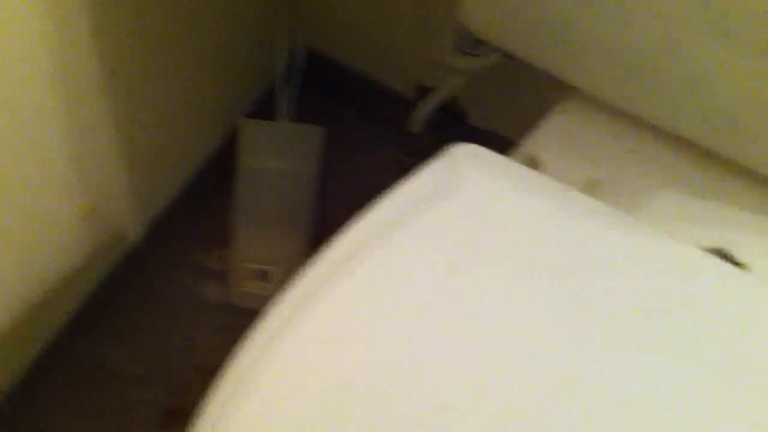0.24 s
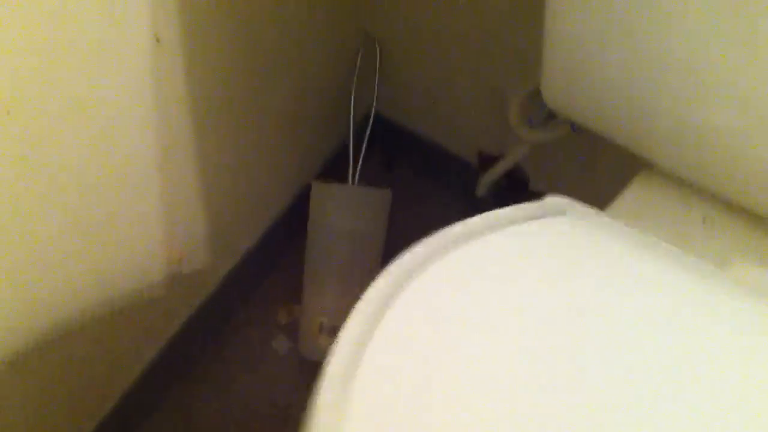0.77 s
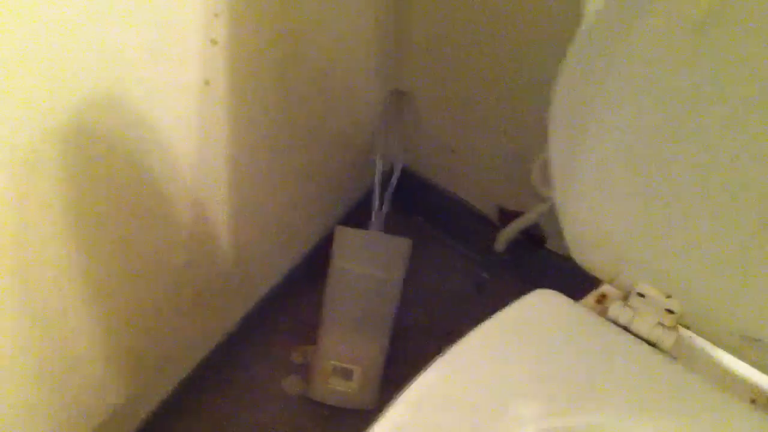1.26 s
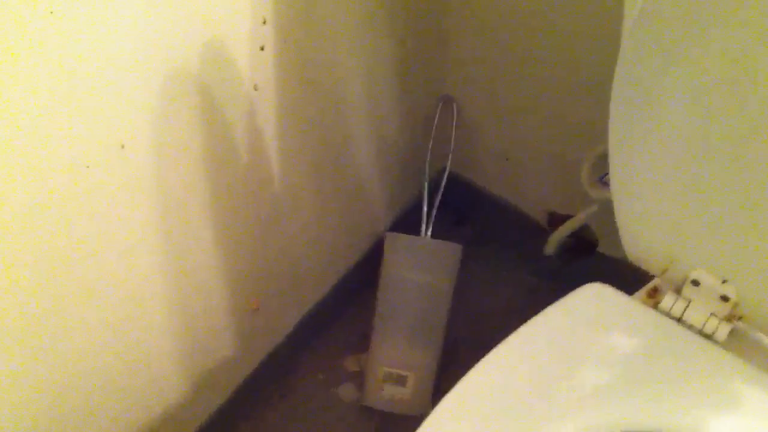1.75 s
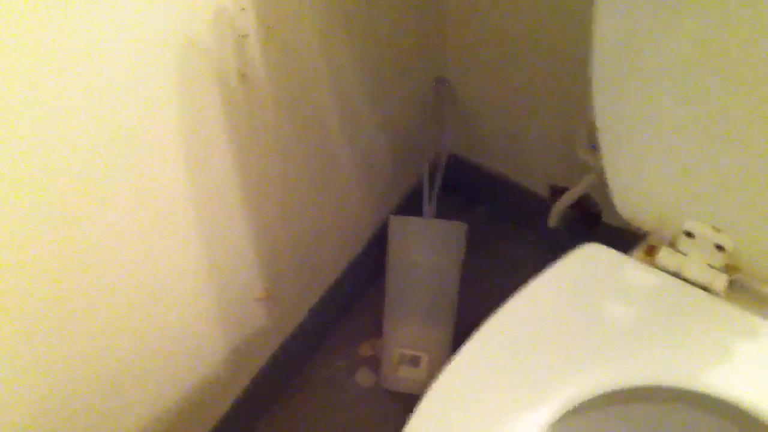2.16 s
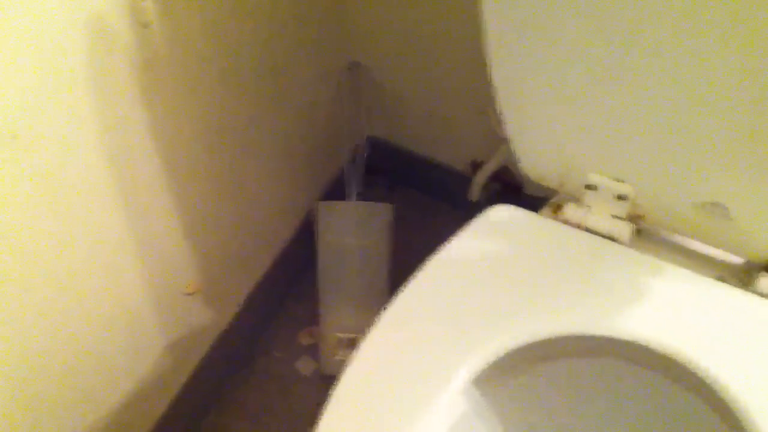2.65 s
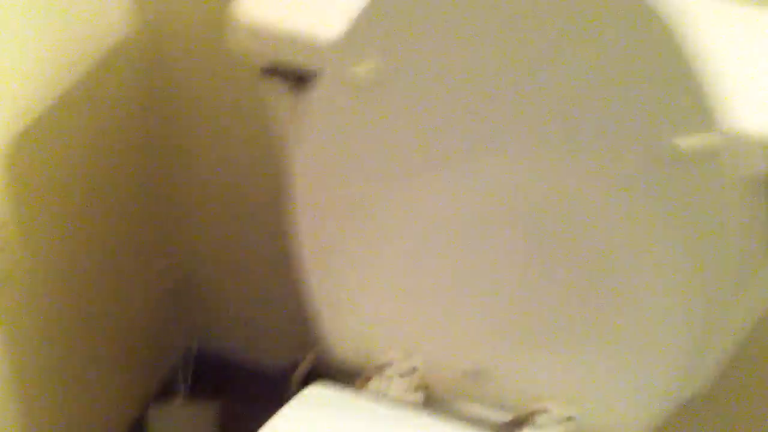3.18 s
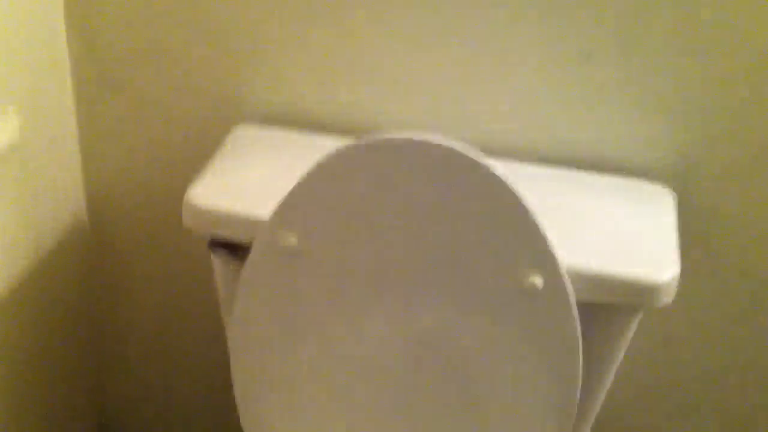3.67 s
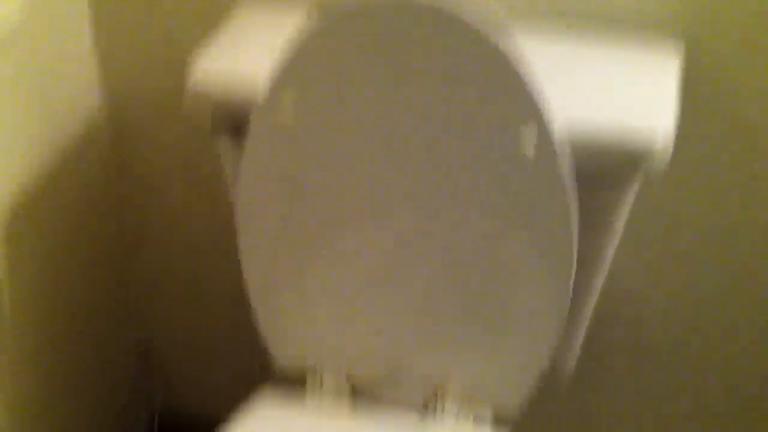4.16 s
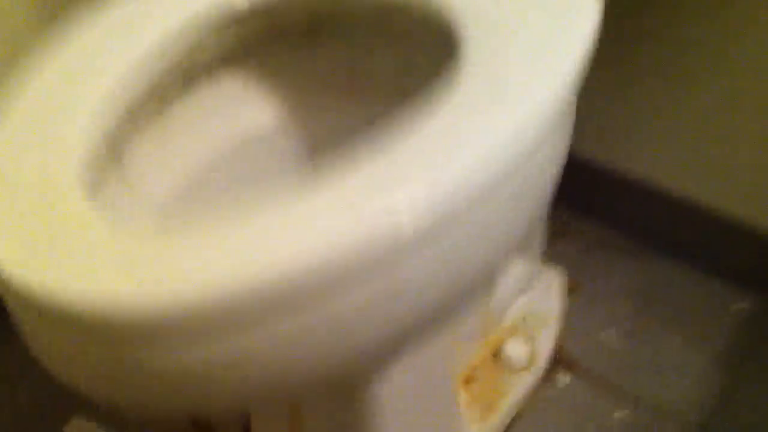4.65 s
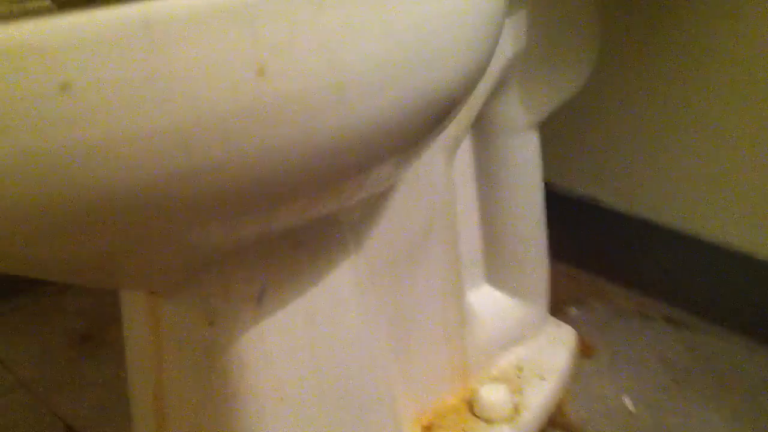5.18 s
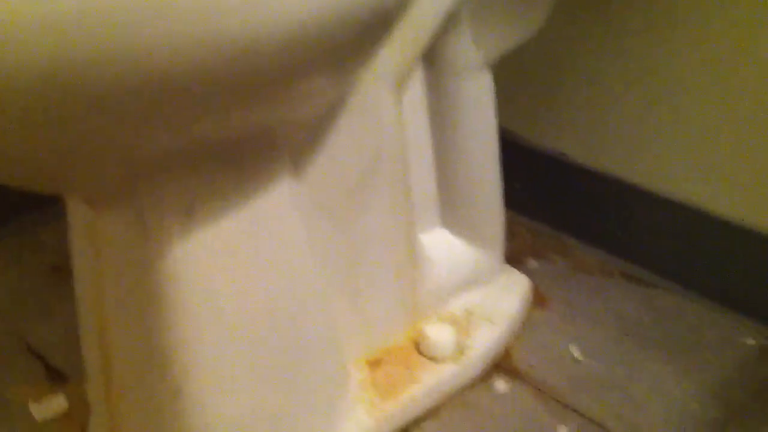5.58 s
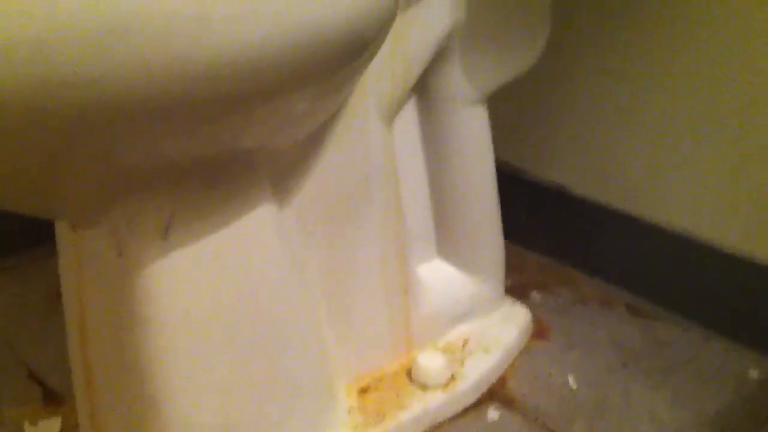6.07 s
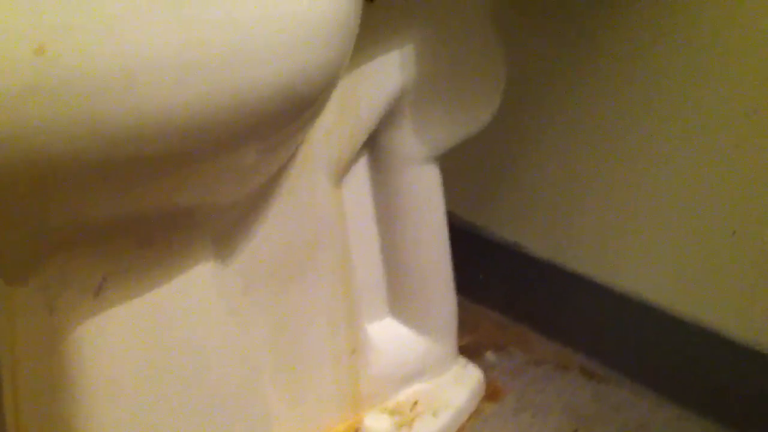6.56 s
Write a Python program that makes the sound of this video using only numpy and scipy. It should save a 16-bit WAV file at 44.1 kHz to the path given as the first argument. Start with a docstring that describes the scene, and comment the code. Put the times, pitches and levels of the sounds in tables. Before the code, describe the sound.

Water rushes softly into a toilet tank, a lid clacks once, and the hissing flow stops with a pipe knock while a fan hums.

```python
"""A toilet tank refills in a small restroom: water rushes steadily into the hollow tank.
After one faint click the raised plastic lid knocks back against the tank. The fill valve narrows,
hisses brighter and slams shut, so the pipe knocks and shudders. A few light ticks and bumps follow.
A fan hums throughout."""
import sys
import numpy as np
from scipy import signal
from scipy.fft import rfft, irfft
from scipy.io import wavfile

SR = 44100
rng = np.random.default_rng(int(sys.argv[2]) if len(sys.argv) > 2 else 0)


def put_to_file(sound):
    """Save the sound as 16-bit audio at rate SR, in the file named by the first command-line argument."""
    columns = np.atleast_2d(sound).T  # one column per channel
    safe = np.clip(columns, -1, 1)
    whole_steps = np.round(safe * 32767)
    wavfile.write(sys.argv[1], SR, whole_steps.astype(np.int16))


N = 300673
TIME = np.arange(N) / SR
HZ = np.maximum(np.fft.rfftfreq(N, 1 / SR), 1)
SHUT_S = 5.126  # fill valve seats

# pipe and tank wall modes (frequency [Hz], level [dB], t60 [s])
PIPE_MODES = [(114, -16.5, 0.055), (165, -11.5, 0.08), (327.6, -13, 0.073), (475, -11, .035),
              (580, -18, .06), (820, -14, 0.071), (990, -25, 0.038), (1540, -11, 0.033),
              (1620, -11.5, 0.032)]


def refill(rush_db=-48.5, walls_db=-3):
    """Water rushes into the hollow tank, heard from a point that moves from its side to its front."""
    # rush spectra (frequency [Hz], density [dB])
    beside_spectrum = [(50, -50.5), (80, -28), (115, -7.5), (175, 2), (265, -11), (310, -1.5), (540, -3.5),
                       (700, -8), (1000, -11.5), (1600, -10), (2700, -20.5), (4500, -23), (8000, -35),
                       (12000, -44.5)]
    front_spectrum = [(47, -68), (80, -34.5), (103, -24), (141, -8.5), (163, -2.5), (201, -19.5),
                      (233, 0.5), (264, -4.5), (362, -3.5), (465, -12.5), (754, -0.5), (1330, -10),
                      (1510, -10), (2710, -19), (12000, -41.5), (15600, -70.5), (22000, -120)]
    # cavity resonances (frequency [Hz], width [Hz], lift [dB])
    tank_resonances = [(226.6, 10, 13.5), (303, 60, 6.5), (412, 4.8, 9), (488, 20, 7), (615.4, 12, 11.5),
                       (639.6, 18, 11), (750.5, 18, 12), (860, 41, 7.5), (1245, 17, 12.5), (1500, 120, 1)]
    # wall reflection (frequency [Hz], level [dB])
    wall_spectrum = [(300, -13), (900, -3), (2000, -5.5), (17000, -3.5)]
    # listening position (time [s], front share [0-1])
    position = [(2.7, 0.12), (3.4, 0.72), (4.4, 0.63), (4.9, 0.61)]
    front = at_time(position)
    beside_water, front_water = noise(beside_spectrum, tank_resonances), noise(front_spectrum)
    rush = 0
    for share, water in ((1 - front, beside_water), (front, front_water)):
        echoes = reflections(water, wall_spectrum, build_s=0.00099)  # own pattern per position
        rush = rush + np.sqrt(share) * rms_one(water + from_db(walls_db) * echoes)
    return valve_open() * (from_db(rush_db) * rush + valve_spray())


def valve_spray():
    """The narrowing valve sprays ever louder, with one earlier surge and flurries of thin sizzle."""
    # spray at the seat (frequency [Hz], density [dB])
    spray_spectrum = [(1200, -13), (2800, -0.5), (4500, 1), (7000, -1.5), (9000, -3.5), (11500, -8),
                      (14500, -5.5), (17000, -5.5)]
    # sizzle flurries (time [s], length [s], level [dB])
    flurries = [(3.097, .3, -74), (4.335, .03, -75), (4.478, .04, -68)]
    sizzle = sum(swell(s, db, 190, 190, hold_s=length_s) for s, length_s, db in flurries)
    sizzle = sizzle * narrow_noise(hz=11100, width_hz=1900)
    spray = swell(SHUT_S, db=-50, rise_db_per_s=23, fall_db_per_s=0) * noise(spray_spectrum)
    surge = swell(s=3.48, db=-61, rise_db_per_s=21, fall_db_per_s=80)
    surge = surge * cut(noise(spray_spectrum), "low", hz=11000, order=1)
    return spray + surge + sizzle


def valve_open(choke_db_per_s=1299):
    """Flow gain: 1 until the valve seats, then choked off."""
    return from_db(-choke_db_per_s * np.maximum(TIME - SHUT_S, 0))


def valve_slam(peak_s=5.075, rise_db_per_s=1101):
    """The last water tears through the closing seat: rumble and bright spit, each with a faint tail."""
    # turbulence spectra (frequency [Hz], density [dB])
    judder_spectrum = [(20, -27), (50, -28), (85, -10.5), (125, 3.5), (210, -4.5), (340, 2), (420, -9),
                       (640, -4), (820, -12), (1150, -11.5), (1650, -15), (2200, -28), (3000, -58)]
    spit_spectrum = [(1060, -35), (1800, -4), (3510, -8.5), (4440, -12.5), (4740, -16.5), (5110, -16.5),
                     (7940, -25), (17000, -43)]
    judder = swell(peak_s, -9.5, rise_db_per_s, fall_db_per_s=349.5) * valve_open()
    judder += swell(SHUT_S, -45, rise_db_per_s, fall_db_per_s=120)
    spit = swell(peak_s, -22.5, rise_db_per_s=850, fall_db_per_s=420.5) * valve_open()
    spit += swell(SHUT_S, -62, rise_db_per_s, fall_db_per_s=190)
    return judder * noise(judder_spectrum) + spit * noise(spit_spectrum)


def water_hammer(gain_db=-1):
    """Pressure waves from the stopped water column strike the pipe."""
    # blows (time [s], strength [dB], contact [ms])
    blows = [(5.0372, -26.5, 0.3), (5.0648, -4, 0.42), (5.0728, -3.5, 0.085), (5.08, 6, 0.66),
             (5.0887, -10.5, 0.34), (5.1007, -11, 1), (5.1168, -8, 0.94), (5.1268, -18, 0.97)]
    return from_db(gain_db) * cut(ring(contacts(blows), PIPE_MODES), "high", hz=80.5, order=4)


def lid(room_db=-2, crack_db=-20):
    """The lid cracks against the china, rebounds and rings into the room."""
    # lid on tank (time [s], strength [dB], contact [ms])
    knocks = [(2.5884, -5, 0.048), (2.5907, 11, 0.39), (2.5985, 0, 0.32), (2.615, -13.5, 0.32),
              (2.6213, -11, 0.59), (2.661, -17.5, 0.67), (2.6802, -16, 0.32)]
    # lid and tank modes (frequency [Hz], level [dB], t60 [s])
    modes = [(88, -43, 0.45), (148.9, -35.5, 0.21), (190.4, -21.5, 0.21), (309.5, -27, 0.42),
             (375.2, -30, 0.262), (410.6, -39.5, 0.29), (459.5, -30.5, 0.38), (502, -27.5, 0.31),
             (532, -32.5, 0.25), (597, -24.5, 0.384), (629, -37, 0.3), (666.4, -26, 0.206),
             (710, -32.5, 0.24), (800, -34.5, 0.339), (869, -16.5, 0.075), (888, -28, 0.18),
             (908, -31, 0.35), (948, -23.5, 0.28), (1046, -16.5, 0.08), (1340, -29.5, 0.313),
             (1361, -31.5, 0.36), (1537, -23, 0.14), (1625, -19.8, 0.11), (1654, -34.5, 0.271),
             (1836, -24.5, 0.246), (2124, -27.5, 0.18), (2250, -28.5, 0.16), (2495, -31.5, 0.182),
             (2779, -26, 0.24), (3168, -22.5, 0.22), (4040, -30.5, 0.14), (4856, -32, 0.19),
             (5200, -33, 0.18), (5720, -35, 0.18)]
    # knock reflections (frequency [Hz], density [dB])
    room_spectrum = [(50, -30), (100, -15), (200, -4.5), (400, -1.5), (950, -5.5), (1250, -11),
                     (1700, -14.5), (2400, -12), (3500, -17), (5400, -24.5), (8000, -35.5), (14000, -53.5)]
    crack = snap(knocks[0][0], crack_db, decay_s=0.003) * narrow_noise(hz=4730, width_hz=2560)
    clicks = contacts([(s, db, 0) for s, db, _ in knocks])
    room = reflections(clicks, room_spectrum, build_s=0.003)
    knock = ring(contacts(knocks), modes) + from_db(room_db) * room + crack
    # the knock carries neither deep bass nor top treble
    return cut(cut(knock, "high", hz=112, order=4), "low", hz=8200, order=4)


def faint_click():
    """One faint, woody click before the lid is raised."""
    return snap(s=0.192, db=-48, decay_s=0.041) * narrow_noise(hz=1510, width_hz=1100)


def plumbing_bumps(gain_db=-3):
    """Soft contacts ring the pipe dully."""
    # bumps (time [s], strength [dB], contact [ms])
    bumps = [(4.646, -24, 0.74), (4.661, -36, .3), (5.42, -18.5, 2.6), (5.439, -26, 2), (5.448, -21, 3.2),
             (5.459, -26, 1.26), (5.76, -30.5, 1.3), (5.77, -30, 2.1)]
    return from_db(gain_db) * cut(ring(contacts(bumps), PIPE_MODES), "high", hz=70.2, order=2)


def ticks(tap_db=20, tail_db=-24):
    """Tiny taps, each with a gritty scuff and a faint tail."""
    # ticks (time [s], level [dB], decay [s], low-pass corner [Hz])
    events = [(4.659, -36.5, 0.031, 2000), (5.393, -38.5, 0.008, 700), (5.423, -36.5, 0.023, 500),
              (5.438, -31.5, 0.023, 500), (5.4608, -40, 0.0012, 1300), (5.4925, -42, 0.001, 1400),
              (5.687, -44, 0.0017, 1600), (5.787, -33, 0.0012, 800), (5.8589, -36.5, 0.001, 1800)]
    out = 0
    for s, db, decay_s, hz in events:
        envelope = snap(s, db, decay_s) + snap(s, db + tail_db, decay_s=0.035)
        scuff = envelope * rng.standard_normal(N)
        tick = scuff + contacts([(s, db + tap_db, 0.3)]) + 1e-18
        tick = cut(cut(tick, "low", hz, order=1), "low", 4 * hz, order=1)
        out = out + cut(tick, "high", hz=276, order=2)
    return out


def fan(blade_hz=205.5, mains_hum_hz=120, waver_rad=0.12, flutter_db=1.5, air_db=-59.5):
    """The blade tone wavers in pitch and level over motor hum and moving air."""
    # blade tone along the listening path, dead spot in front of the tank (time [s], level [dB])
    tone_levels = [(0, -52), (1.2, -51), (3.15, -53), (3.85, -70), (4.42, -69), (4.7, -53), (5.3, -56),
                   (5.6, -58.5), (6.8, -60.5)]
    # moving air (frequency [Hz], density [dB])
    air_spectrum = [(15, -52), (25, -18), (43, -36.5), (103, -11), (151, -14), (204, -2.5), (228, -8.5),
                    (261, -8.5), (353, -15), (661, -16.5), (737, -15), (917, -22), (2140, -30.5),
                    (10400, -36.5), (17000, -35.5)]
    level_db = at_time(tone_levels) + flutter_db * narrow_noise(hz=2, width_hz=5)
    phase = 2 * np.pi * blade_hz * TIME + waver_rad * narrow_noise(hz=0.86, width_hz=5.4)
    tone = from_db(level_db) * (np.sin(phase) + from_db(-13) * np.sin(2 * phase))
    motor_phase = 2 * np.pi * mains_hum_hz * TIME
    motor = from_db(-70) * np.sin(motor_phase) + from_db(-66) * np.sin(2 * motor_phase)
    return np.sqrt(2) * (tone + motor) + from_db(air_db) * noise(air_spectrum)


def reflections(x, spectrum, build_s):
    """Dense room echoes of x: they build up, then each octave dies at its own rate."""
    # room decay (frequency [Hz], t60 [s])
    room_t60 = [(120, 0.16), (450, 0.63), (900, 0.46), (1800, 0.45), (4000, 0.12), (9000, 0.6)]
    t, source, response = TIME[:SR], noise(spectrum)[:SR], 0
    edges_hz = np.geomspace(60, 16000, 9)
    for low, high in zip(edges_hz, edges_hz[1:]):
        band = signal.sosfiltfilt(signal.butter(3, [low, high], "band", fs=SR, output="sos"), source)
        response = response + band * from_db(-60 * t / at_hz(room_t60, np.sqrt(low * high)))
    response = response * (1 - np.exp(-t / build_s))
    return signal.fftconvolve(x, response / np.sqrt(np.sum(response ** 2)))[:N]


def contacts(rows):
    """Force pulses: the longer the contact, the duller."""
    force, ms = np.zeros(N), 1000 * TIME[:512]
    for s, db, contact_ms in rows:
        pulse = ms * np.exp(-4 * ms / max(contact_ms, 0.03))
        start = round(s * SR)
        force[start:start + len(pulse)] += from_db(db) * pulse / pulse.sum()
    return force


def ring(force, modes):
    """A body answers a force with decaying sines of alternating sign."""
    t = TIME[:SR]
    response = sum((-1) ** k * from_db(db - 60 * t / t60) * np.sin(2 * np.pi * hz * t)
                   for k, (hz, db, t60) in enumerate(modes))
    return signal.fftconvolve(force, response)[:N]


def noise(spectrum, resonances=()):
    """Coloured noise, lifted at each resonance; rms 1."""
    db = at_hz(spectrum, HZ)
    for hz, width_hz, lift_db in resonances:
        db = db + lift_db / (1 + (2 * (HZ - hz) / width_hz) ** 2)
    return rms_one(irfft(from_db(db) * rfft(rng.standard_normal(N)), N))


def narrow_noise(hz, width_hz):
    """Noise in one bell-shaped band; rms 1."""
    bell = np.exp(-2 * ((HZ - hz) / width_hz) ** 2)
    return rms_one(irfft(bell * rfft(rng.standard_normal(N)), N))


def snap(s, db, decay_s):
    """Envelope: jumps up at s, then decays."""
    return from_db(db) * (TIME >= s) * np.exp(-np.abs(TIME - s) / decay_s)


def swell(s, db, rise_db_per_s, fall_db_per_s, hold_s=0):
    """Envelope: climbs to db at s, holds, falls."""
    before_s, after_s = np.maximum(s - TIME, 0), np.maximum(TIME - s - hold_s, 0)
    return from_db(db - rise_db_per_s * before_s - fall_db_per_s * after_s)


def cut(x, kind, hz, order):
    """Butterworth high-pass or low-pass."""
    return signal.sosfilt(signal.butter(order, hz, kind, fs=SR, output="sos"), x)


def at_time(points):
    """Curve value at every sample."""
    return np.interp(TIME, *np.transpose(points))


def at_hz(points, hz):
    """Curve value on a log-frequency axis."""
    points_hz, values = np.transpose(points)
    return np.interp(np.log(hz), np.log(points_hz), values)


def from_db(db):
    """Decibels to gain."""
    return 10 ** (np.asarray(db) / 20)


def rms_one(x):
    """Scale to unit power."""
    return x / np.sqrt(np.mean(x ** 2) + 1e-20)


def scene():
    """Mono sum of all sources."""
    mix = faint_click() + lid() + refill() + valve_slam() + water_hammer() + plumbing_bumps()
    return (mix + ticks() + fan())[None]


def record(dry):
    """Clip at full scale, then low-pass steeply."""
    cutoff_hz = 17200
    return signal.sosfilt(signal.ellip(10, 0.1, 80, cutoff_hz, fs=SR, output="sos"), np.clip(dry, -1, 1))


dry = scene()
out = record(dry)
put_to_file(out)
```